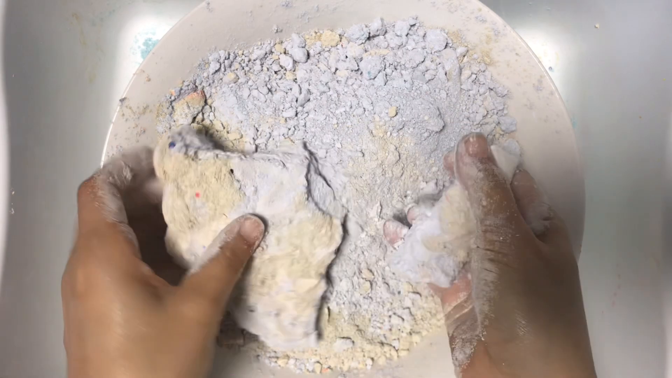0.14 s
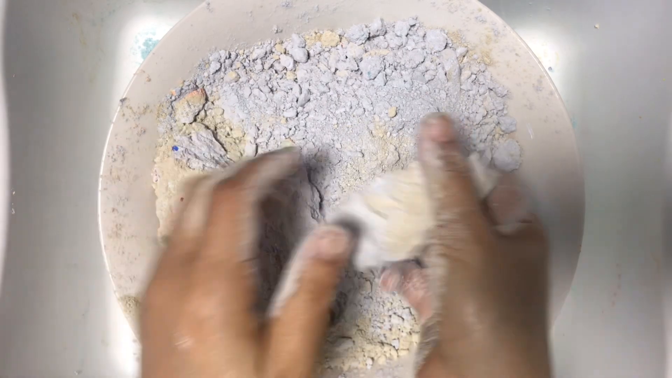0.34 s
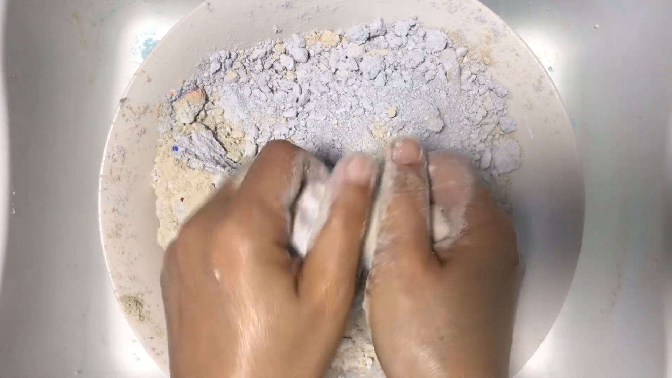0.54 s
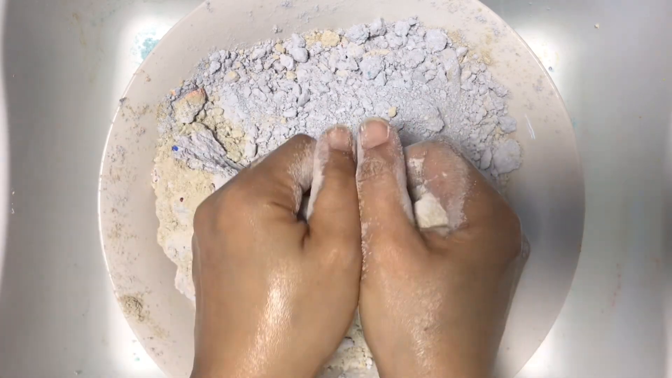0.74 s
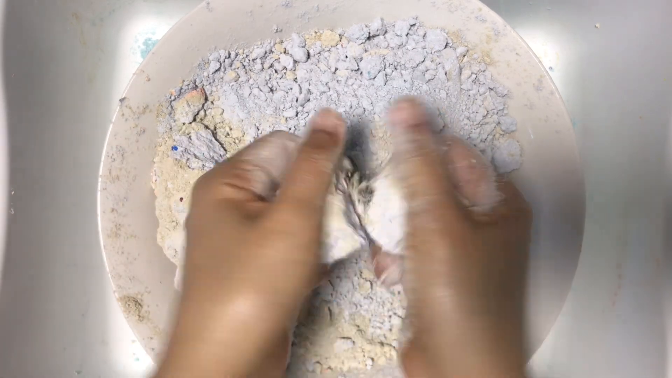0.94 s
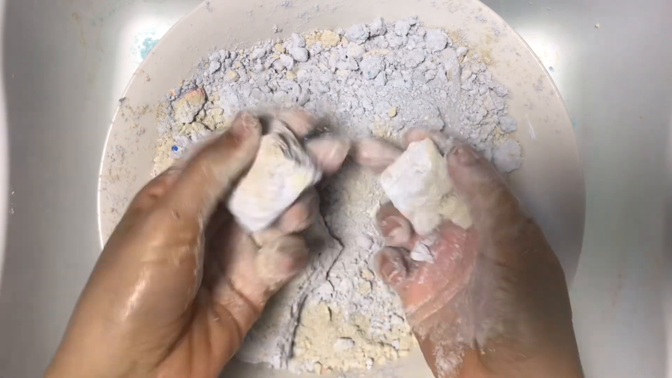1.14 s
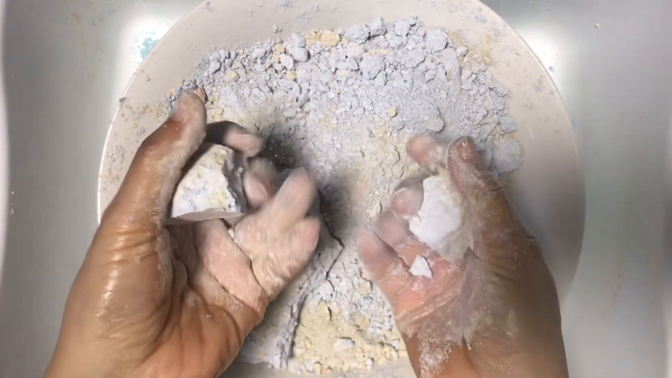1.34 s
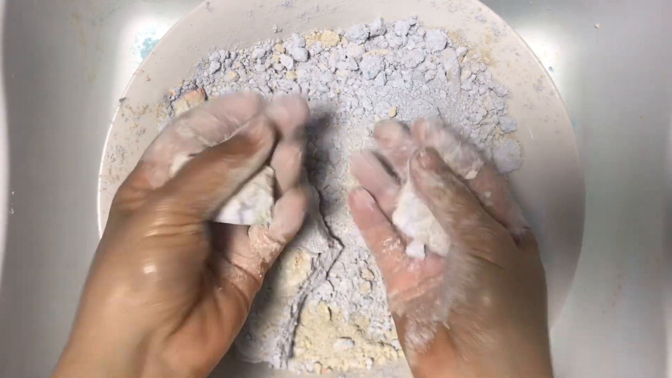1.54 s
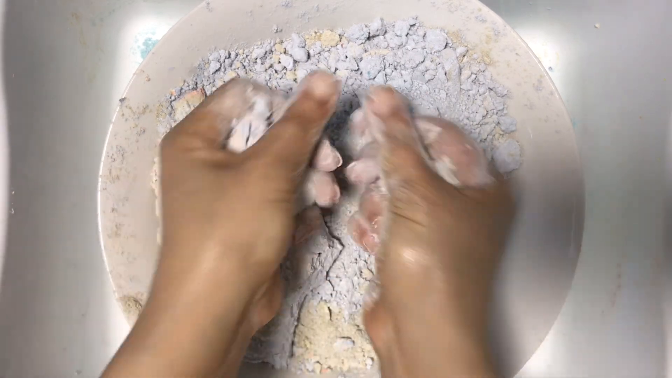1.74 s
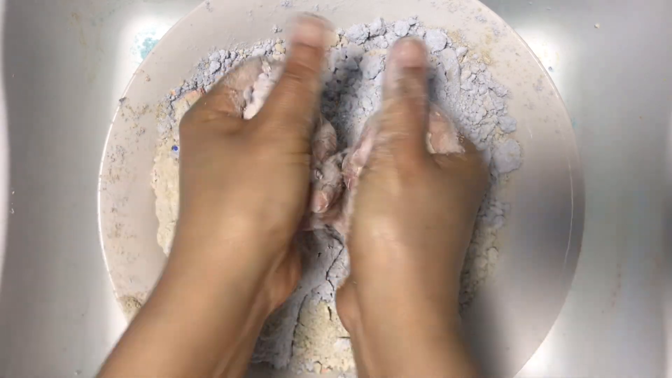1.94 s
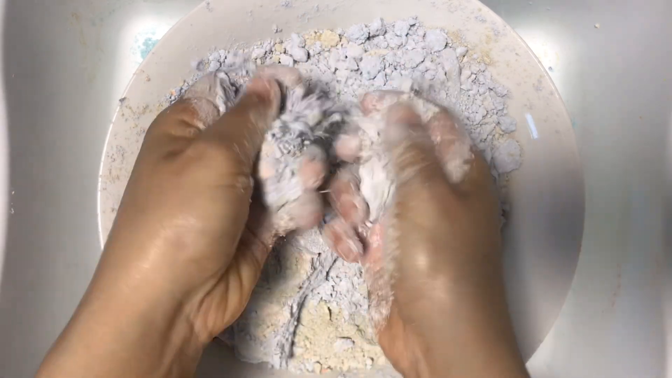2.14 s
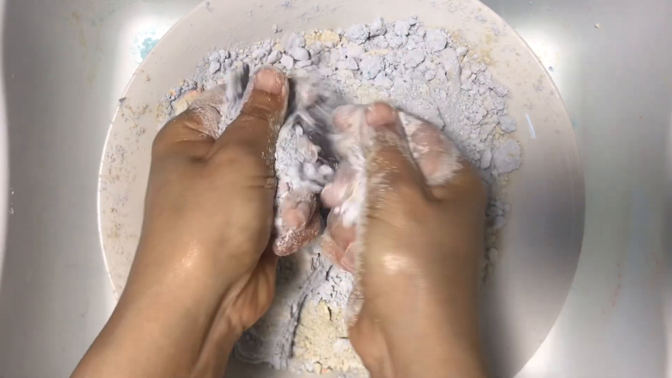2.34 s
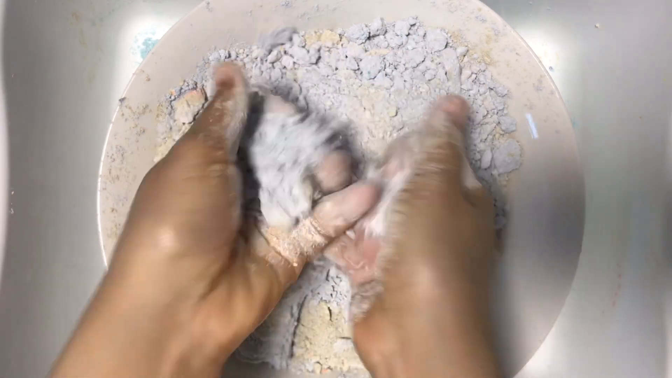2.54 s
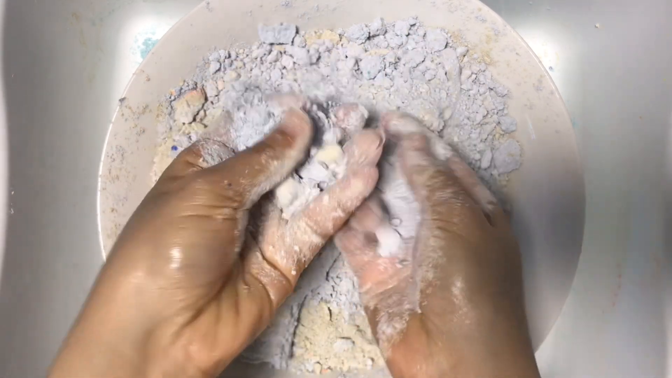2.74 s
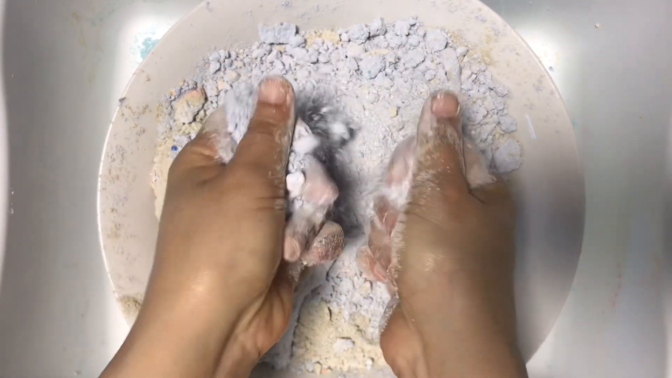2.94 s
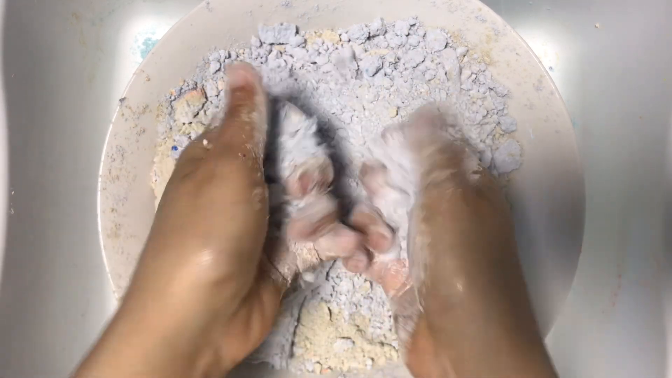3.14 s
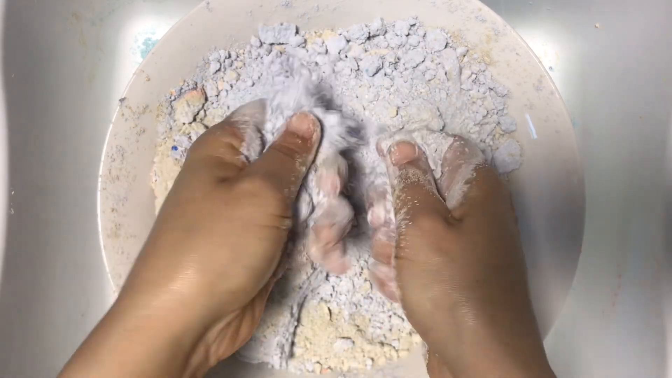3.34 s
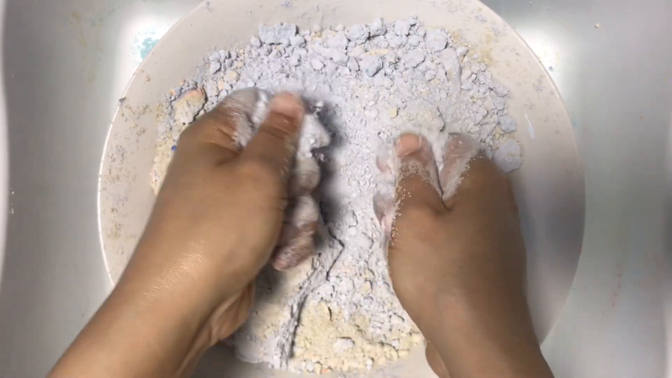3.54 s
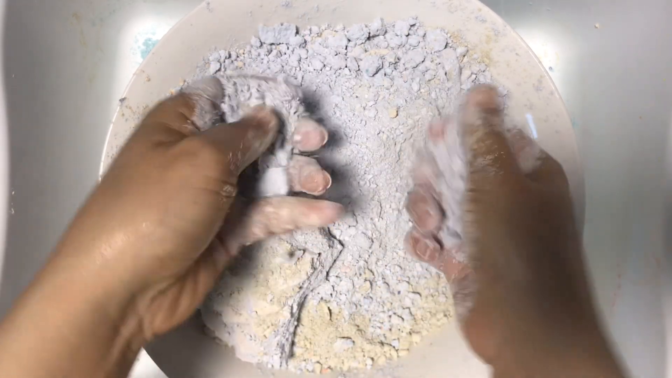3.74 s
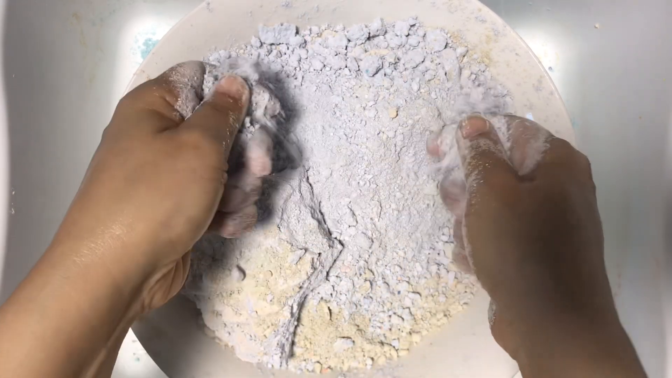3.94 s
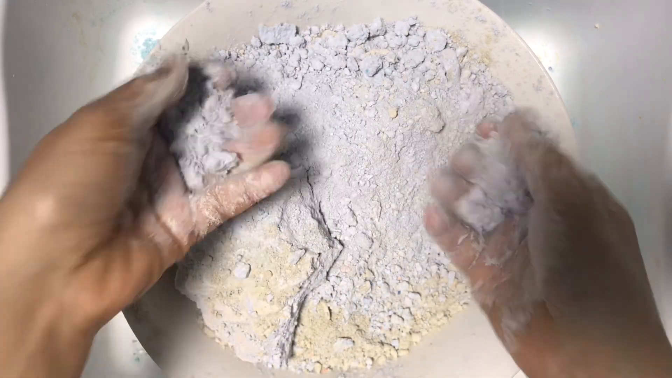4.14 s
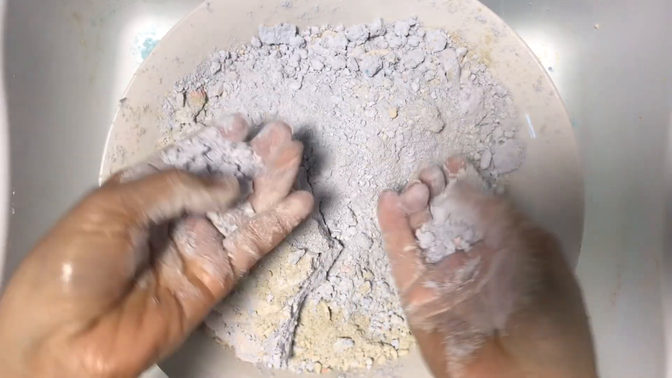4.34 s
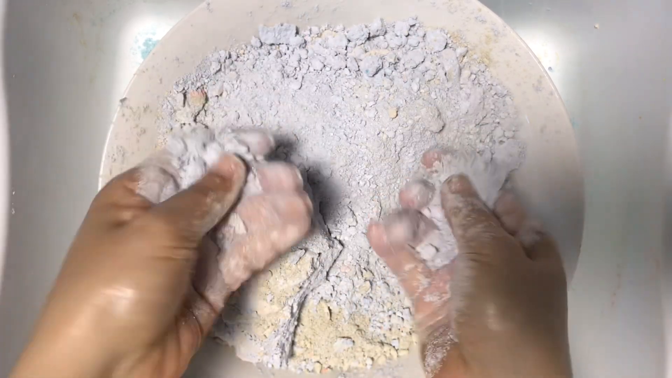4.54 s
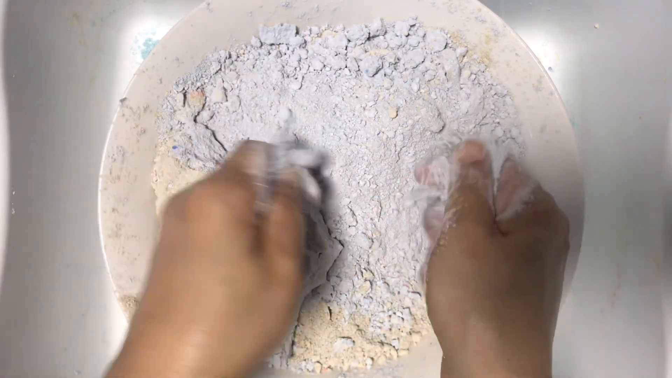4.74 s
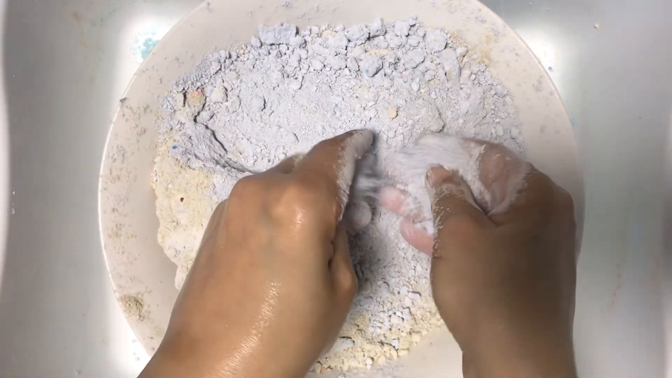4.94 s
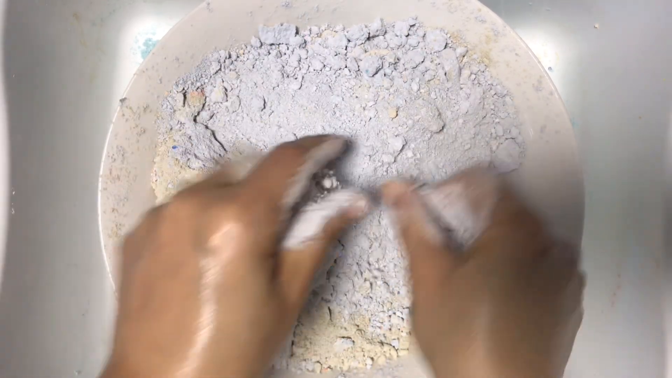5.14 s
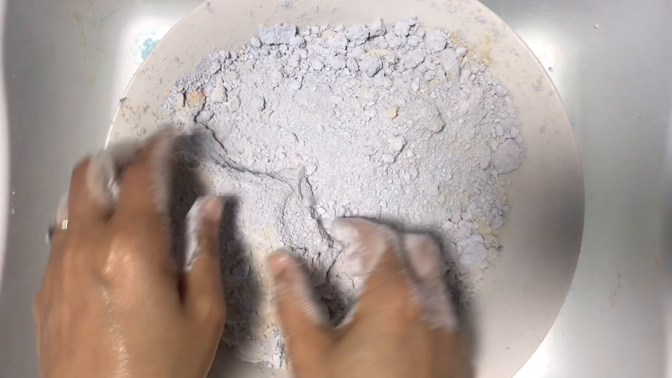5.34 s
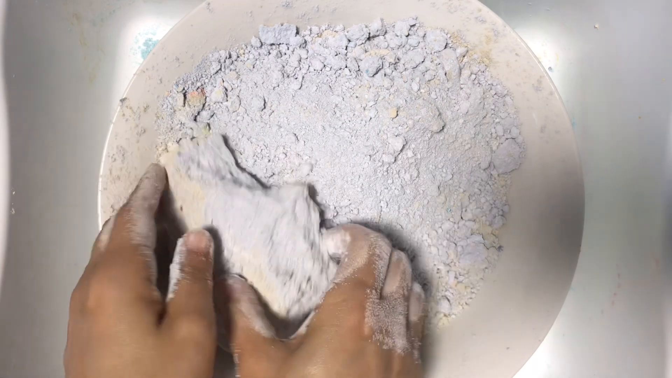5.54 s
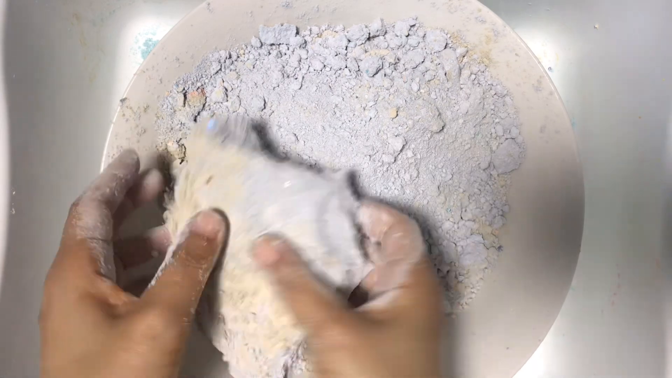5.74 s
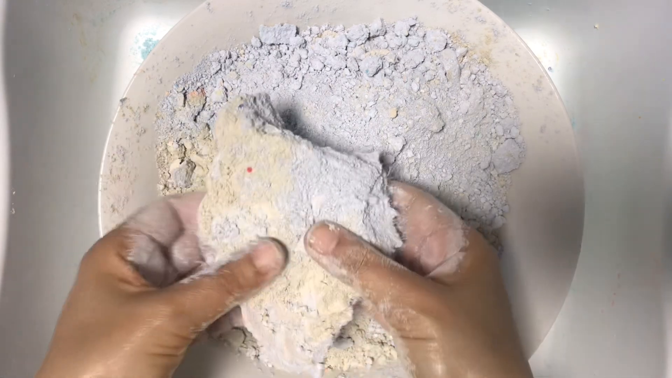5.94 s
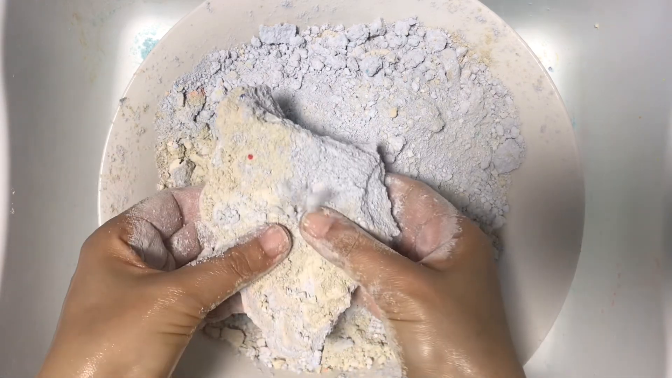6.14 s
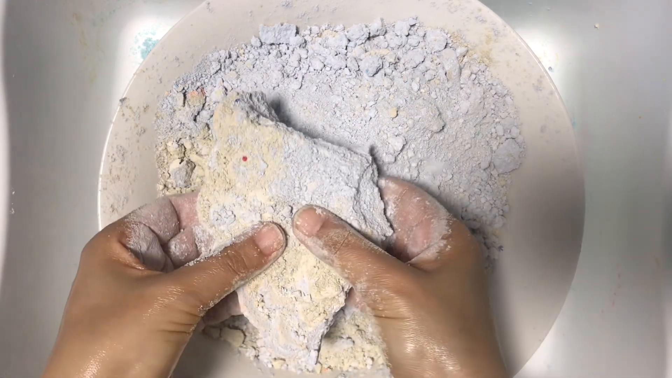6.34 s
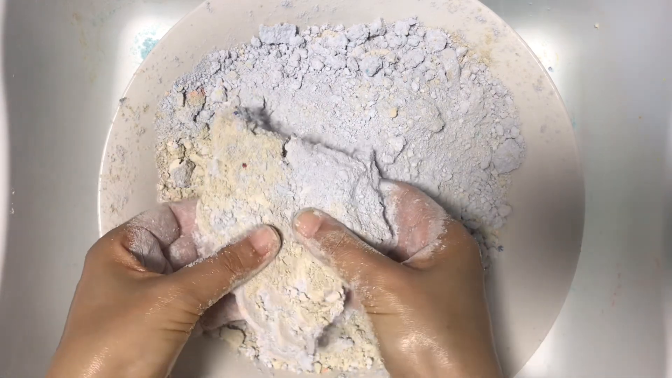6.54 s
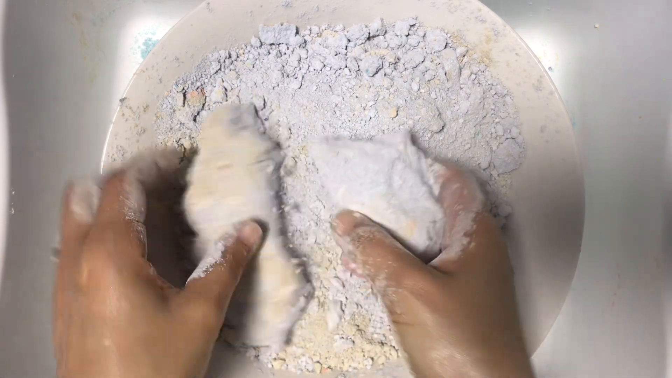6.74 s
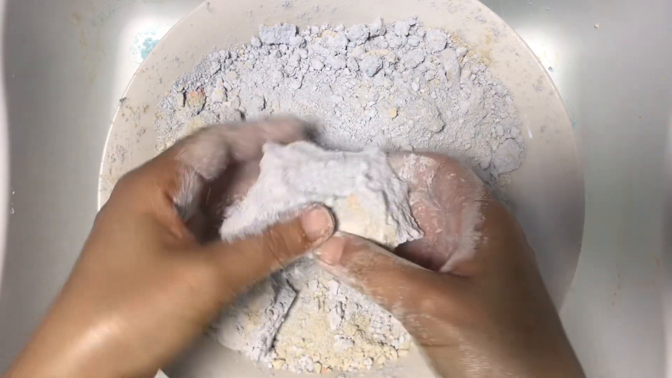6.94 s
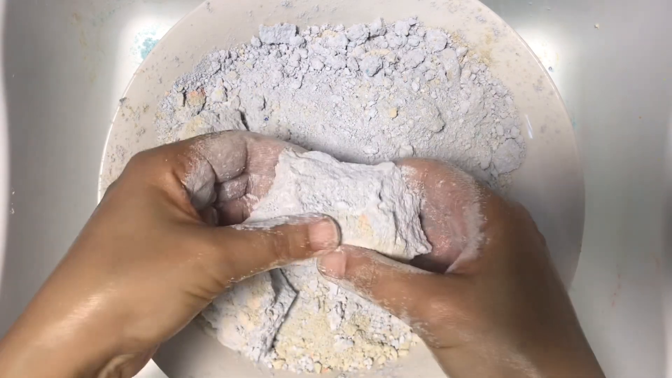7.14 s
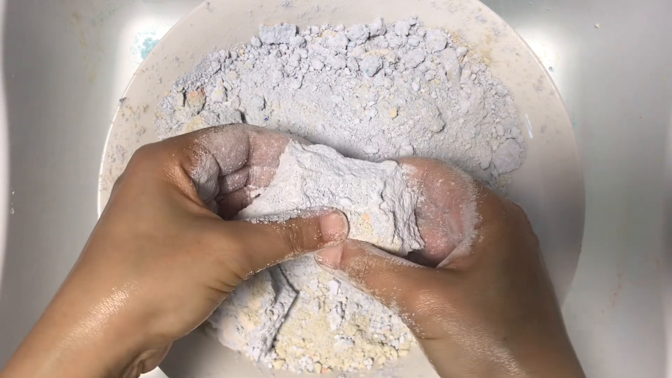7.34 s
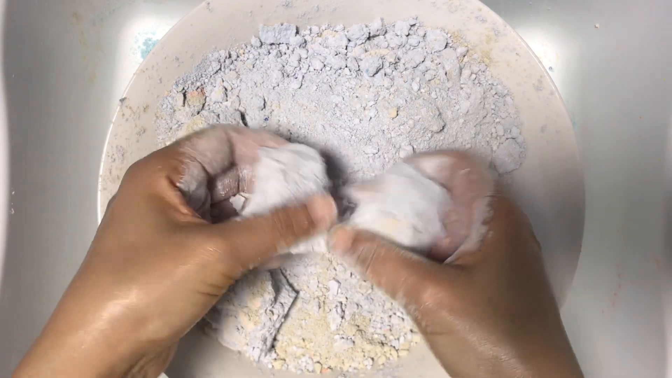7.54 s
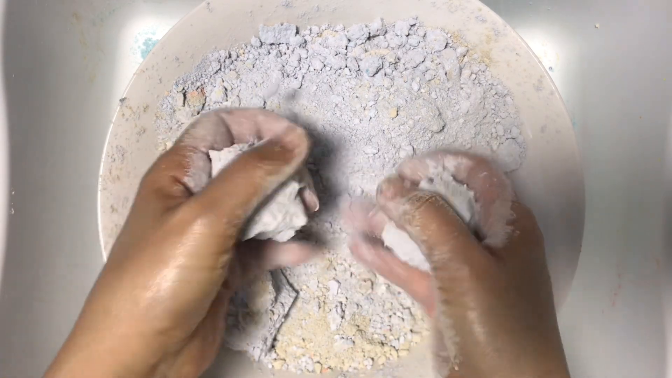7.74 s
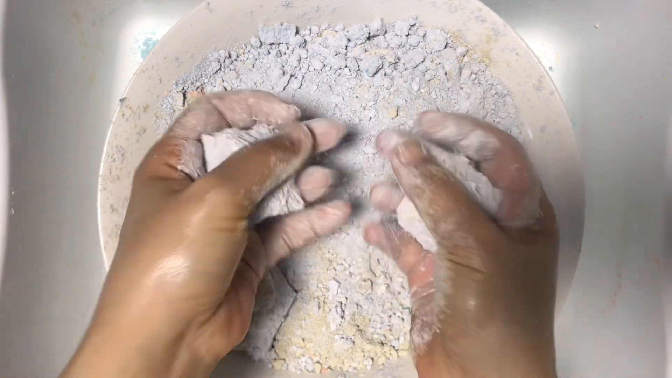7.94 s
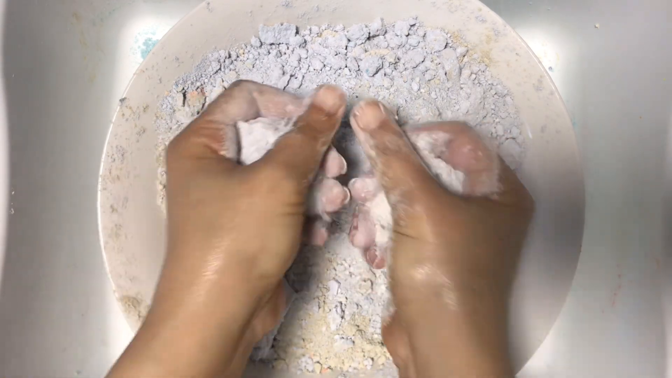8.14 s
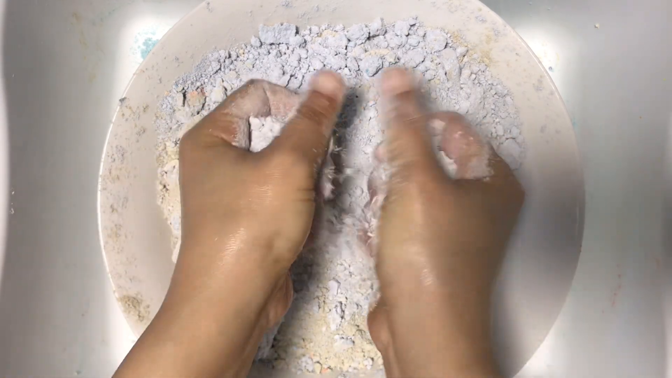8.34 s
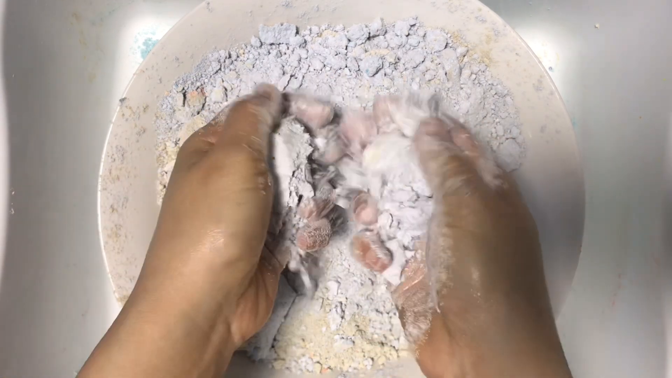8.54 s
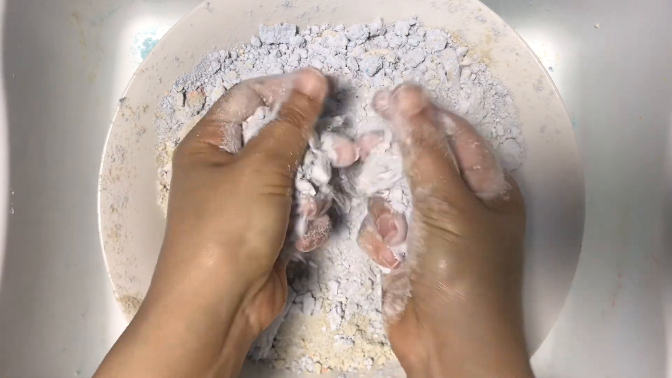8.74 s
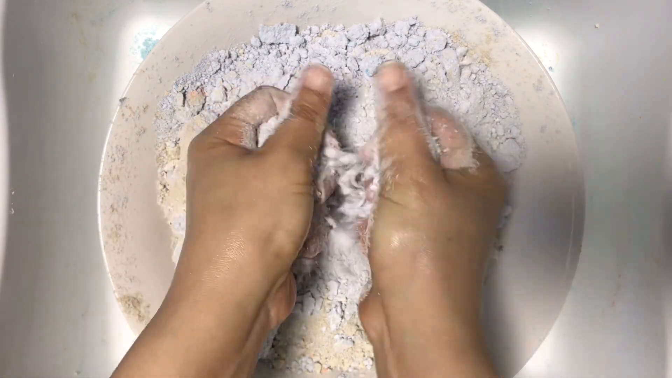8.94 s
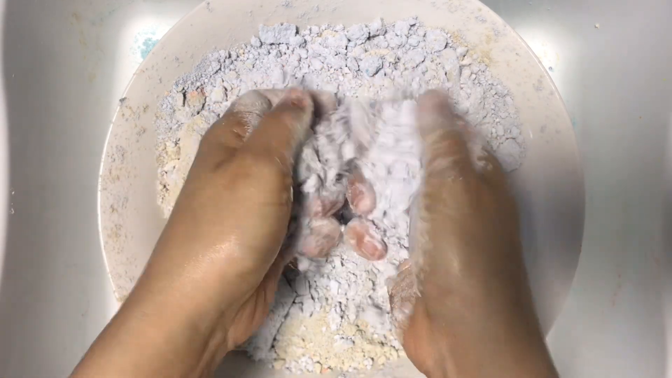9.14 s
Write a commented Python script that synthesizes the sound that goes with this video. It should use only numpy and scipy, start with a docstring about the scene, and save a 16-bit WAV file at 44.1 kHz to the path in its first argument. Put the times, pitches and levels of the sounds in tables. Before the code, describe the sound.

Close, dry crackling of chalk crushed by hand, powdery rubbing and pattering crumbs, a few heavy low thumps, in a quiet room.

```python
"""Chalk crumbled over a bowl

Two hands break and crumble lumps of chalk over a bowl of powder on a table; a phone stands close by on it.
Shaped noise makes the hiss of powder, the crunch and the dust; short rings make the snaps of the lumps.
Stretching swings thud in the table, decaying modes ring the bowl and a thin bangle,
and a slow drifting tone is the jolted stand. A quiet room lies behind."""
import sys
import numpy as np
from scipy import signal
from scipy.fft import rfft, irfft, next_fast_len
from scipy.io import wavfile
from scipy.ndimage import uniform_filter1d

SR = 44100
rng = np.random.default_rng(int(sys.argv[2]) if len(sys.argv) > 2 else 0)


def makeup_ratio(level_db):
    """Linear amplitude ratio for a level in decibels (20 dB per factor of ten)."""
    decades = np.asarray(level_db, float) / 20
    return 10 ** decades


def transcribe(signal):
    """Save signal, clipped to [-1, 1], as a 16-bit WAV file at the path in sys.argv[1]."""
    frames = np.atleast_2d(signal).T
    limited = np.clip(frames, -1, 1)
    pcm = np.round(limited * 32767).astype(np.int16)
    wavfile.write(sys.argv[1], SR, pcm)


N = 409688
T = np.arange(N) / SR

# work of the hands: [t/s, powder hiss level/dB, crumb crunch level/dB, weight on the table before shaping level/dB]
HAND_WORK = [(0.0, -49.5, -49, -43), (0.18, -56.5, -52, -38.5), (.3, -59, -57.5, -50),
             (0.57, -50.5, -60, -58), (0.82, -70, -62, -66), (1, -62, -54.5, -43.5),
             (1.25, -54.5, -56, -51), (1.52, -53, -55, -52), (1.6, -44, -49.5, -41),
             (1.76, -68, -48.5, -43), (1.91, -52, -53.5, -48), (2.08, -48.5, -48, -41),
             (2.3, -54, -45.5, -42.5), (2.44, -48, -48.5, -40), (2.51, -60.5, -57, -44),
             (2.75, -48, -52, -43), (2.9, -64, -48.5, -41.5), (3.1, -49.5, -52.5, -45),
             (3.22, -58, -55.5, -44), (3.3, -59, -52.5, -40.5), (3.52, -55.5, -53.5, -46),
             (3.6, -51.5, -52.5, -45), (3.75, -61, -53, -46), (3.98, -52.5, -55, -48),
             (4.2, -66, -56.5, -48), (4.34, -61, -55, -49.5), (4.68, -58, -51, -44.5),
             (4.82, -56, -54.5, -47), (4.97, -56, -48.5, -39.5), (5.12, -54.5, -54.5, -52.5),
             (5.45, -65, -52.5, -38.5), (5.69, -59, -52, -45.5), (5.93, -57, -55.5, -51),
             (6.1, -68, -68, -65), (6.38, -70, -72.5, -68), (6.45, -59, -58.5, -49),
             (6.75, -59, -50.5, -32), (6.91, -52.5, -55, -53), (7.06, -57, -59.5, -50),
             (7.13, -62, -67, -56), (7.33, -73, -71.5, -65), (7.45, -56.5, -62.5, -55),
             (7.81, -53, -57, -46.5), (8.12, -53.5, -51, -38.5), (8.36, -60, -48.5, -51),
             (8.52, -54.5, -52, -39.5), (8.75, -57, -51, -33.5), (8.98, -58, -52, -41),
             (9.29, -60, -51, -39)]
# spectra: [f/Hz, relative density level/dB]
HISS_SPECTRUM = [(1760, -56), (3000, -20), (3620, -5), (4030, -5), (4410, -3.5), (4860, -6), (6900, -1),
                 (8400, -1.5), (9200, -0.5), (11200, -3.5), (12300, -8), (13900, 0), (15500, 1),
                 (16000, -19)]
CRUNCH_SPECTRUM = [(240, 13.5), (400, 1.5), (569, 1.5), (757, -5), (1100, -1), (1230, -3.5), (1530, -3.5),
                   (1770, -7), (2150, -6), (2610, -6), (2970, -4.5), (3390, -7), (3860, -6.5),
                   (5930, -13.5), (9000, -11.5), (11700, -25), (19800, -120)]
RUMBLE_SPECTRUM = [(76, -19), (130, 0), (162, -2), (215, -1.5), (319, -12.5), (484, -36), (577, -28),
                   (800, -24), (1040, -48), (1760, -120)]
TABLE_HUM_SPECTRUM = [(22, -65), (38, -1), (54, -10.5), (70, -6), (107, -5.5), (121, -4.5), (150, -37),
                      (200, -58), (330, -120)]
DUST_SPECTRUM = [(2060, -12), (3500, -10), (3870, -7), (5930, -7.5), (9260, -5.5), (11500, -15),
                 (13600, -14), (15200, -11), (16000, -23)]
# slides and bright ticks, with the dip of the microphone port: [f/Hz, relative density level/dB]
PORT_SPECTRUM = [(200, 23), (1500, -3.5), (9500, 0), (11700, -7), (14000, -2.5), (17000, -18)]
TABLE_HUM_DB = -1  # over the weight on the table

# breaks of chalk: [t/s, crack peak level/dB, crack pitch f/Hz, dust drive level/dB, crumbs drive level/dB]
SNAP_EVENTS = [(.099, -32, 2570, -46, -45), (.143, -36, 3300, -52, -41.5), (.173, -24, 2655, -46, -18),
               (.406, -41, 1510, -51, -29), (.676, -37, 3000, -50, -48), (.7537, -35, 2260, -33, -27),
               (.9245, -47, 9050, -36, -39), (1.4128, -24, 9050, -28.5, -58), (1.5667, -32, 4070, -32, -30),
               (1.5808, -42, 9130, -27.5, -36), (1.6102, -38, 2130, -36, -44),
               (1.6353, -34, 2300, -51, -51), (1.645, -28, 3770, -48, -56), (1.6703, -40, 7520, -44, -40),
               (1.6905, -32, 2210, -29, -40), (1.705, -24.5, 3080, -25, -44), (1.7105, -26, 2160, -30, -30),
               (1.7371, -19.5, 2200, -30, -18), (1.7618, -20, 2900, -21.5, -18),
               (1.7645, -25, 2300, -33, -30), (1.7704, -29, 1570, -51, -22), (1.7805, -30, 1000, -55, -40),
               (1.7875, -26, 1300, -53, -36), (1.804, -30, 1190, -50, -36), (1.8274, -40, 2290, -28, -15.5),
               (1.839, -37, 2250, -50, -45), (1.851, -36, 1100, -44, -42), (1.883, -37, 1000, -55, -47),
               (1.948, -40, 3500, -35, -40), (1.9716, -33.5, 3670, -33, -30), (2.0413, -43, 7520, -44, -26),
               (2.1244, -42, 6000, -39, -51), (2.2135, -45, 3000, -48, -47), (2.228, -44, 3200, -42, -42),
               (2.2457, -25, 1570, -27, -36), (2.249, -32, 3200, -29, -39), (2.3467, -44, 2700, -38, -41),
               (2.366, -31, 1540, -40, -25), (2.4737, -31, 1010, -39, -21), (2.8474, -43, 2270, -50, -28),
               (2.8902, -29, 1470, -52, -22), (2.9065, -40, 2000, -44, -36),
               (2.9208, -26.5, 1500, -56, -27), (2.931, -31, 3500, -52, -42), (2.94, -35, 2500, -44, -45),
               (2.959, -38, 1500, -50, -47), (2.978, -43, 1200, -55, -49), (3.0074, -38, 6400, -33, -38),
               (3.026, -42, 7000, -44, -46), (3.069, -40, 3500, -48, -43), (3.103, -38.5, 2100, -55, -31),
               (3.1885, -29, 4400, -31, -59), (3.2558, -34, 3220, -48, -35), (3.268, -30, 4200, -46, -27),
               (3.312, -37, 1300, -52, -30), (3.344, -42, 4500, -48, -50), (3.406, -42, 7000, -42, -50),
               (3.4105, -27, 4830, -41, -27), (3.435, -44, 6500, -54, -53), (3.4865, -38, 2140, -57, -28),
               (3.802, -34, 3250, -38, -46), (3.8551, -32, 8500, -38, -33), (3.8823, -29, 9550, -44, -26),
               (4.153, -41, 1490, -35, -28), (4.215, -38, 9500, -33, -53), (4.227, -28, 10700, -34, -37),
               (4.283, -42, 3500, -42, -57), (4.38, -41, 5260, -51, -57), (4.5096, -48, 2960, -30, -27),
               (4.6004, -51, 2500, -52, -47), (4.628, -48, 2300, -52, -36), (4.6693, -45, 1200, -34, -37),
               (4.6897, -36, 2220, -41, -49), (4.725, -45, 2500, -50, -38), (4.9205, -34, 2250, -51, -40),
               (4.9487, -34, 2290, -51, -38), (4.973, -37, 1300, -50, -42), (5.0286, -35, 3040, -37, -34.5),
               (5.1484, -31, 6310, -32, -37), (5.2256, -18.5, 8060, -31, -57), (5.236, -38, 7800, -44, -55),
               (5.3165, -40, 9000, -52, -57), (5.387, -34, 1520, -57, -57), (5.7314, -41, 8750, -49, -57),
               (6.094, -46, 4300, -48, -48), (6.3921, -26.5, 2350, -17.5, -13),
               (6.409, -35, 2150, -36, -35), (6.6054, -40, 1730, -35, -27.5), (7.0095, -43, 3500, -44, -55),
               (7.031, -37, 9000, -46, -60), (7.047, -29, 9780, -50, -59), (7.3376, -23, 2200, -17, -14.5),
               (7.6026, -32, 6260, -39, -42), (7.695, -31, 6100, -55, -58), (7.7253, -35, 4300, -46, -38),
               (7.739, -42, 6000, -51, -60), (7.808, -43, 6000, -55, -62), (7.817, -34, 9550, -45, -68),
               (8.001, -42, 8250, -34, -41), (7.348, -31, 2100, -53, -48), (7.35, -24, 950, -57, -53),
               (7.366, -39, 900, -57, -52), (7.376, -38, 900, -55, -52), (7.359, -40, 2200, -54, -52),
               (8.0406, -25, 2200, -23.5, -20.5), (8.057, -45, 2200, -59, -53),
               (8.067, -47, 2200, -62, -56), (8.1224, -33, 2190, -50, -48), (8.13, -38, 1500, -55, -35),
               (8.1373, -25.5, 4790, -37, -37), (8.154, -29.5, 2250, -48, -52),
               (8.1928, -27, 1570, -49, -20), (8.196, -30, 2200, -40, -35), (8.2287, -25, 1610, -42, -26),
               (8.234, -31, 2300, -36, -20), (8.2372, -17, 3730, -45, -12), (8.2712, -27, 2200, -24.5, -24),
               (8.281, -33, 2200, -53, -60), (8.2924, -31, 4500, -50, -61), (8.3684, -43, 1730, -60, -44),
               (8.4085, -36, 2100, -52, -36), (8.513, -38, 3190, -52, -44), (8.527, -32.5, 1540, -60, -43),
               (8.544, -38, 1300, -58, -34), (8.5825, -36, 1380, -41, -27), (8.689, -33, 3280, -38, -51),
               (8.7205, -40, 2000, -40, -37), (8.742, -29, 3870, -36, -31), (8.768, -31, 3170, -32, -34),
               (8.833, -44, 2190, -55, -50), (8.855, -42, 2940, -53, -30), (8.895, -44, 3800, -54, -45),
               (9.0052, -41, 2780, -35.5, -36), (9.1335, -25, 8950, -27, -28),
               (9.178, -23, 9160, -24.5, -17.5), (9.186, -30.5, 4500, -34, -33)]
PIECE_CYCLES = 11  # cycles until a ringing piece is 60 dB down
CRACK_AFTER_MS = 0.8  # the piece gives way just after the first dust
SPRAY_DB, SPRAY_SLOPE = -5.5, -0.29  # spray drive under a burst of -35 dB; dB change per dB of louder burst
DUST_SPRAY_DB = -1  # dust settles fainter than crumbs
TICK_AFTER_MS = 1.4  # both ticks come near the height of a break
TICK_DB, TICK_MS = -11.5, 0.075  # bright tick: drive over the dust, decay
DULL_TICK_DB, DULL_TICK_MS = -9.5, 0.33  # lower tick: drive over the crumbs, decay
CRUMBS_BOWL_DB, CRACK_BOWL_DB = -21.5, -19.5  # crumbs and cracks drive the upper modes of the bowl
SMALL_COUNT = 500
CROWDING = 1.9  # how strongly lesser snaps gather where the crunch is loud
SMALL_CRACK_DB, SMALL_BURST_DB = -3, -1.5  # ceilings over the crunch of the moment
SMALL_SCATTER_DB = 11  # mean drop below those ceilings

# blows on the table: [t/s, peak level/dB, first swing/ms, decay setting/ms, direction +1 or -1,
# evenness of the swings (1 = all alike)]
THUD_EVENTS = [(.196, -24, 2.8, 7.3, -1, .6), (0.211, -13.5, 3.5, 16, 1, 0.57),
               (0.237, -16, 4.2, 27, 1, 0.63), (0.756, -18.5, 1.9, 7.1, 1, 0.56),
               (0.977, -30, 2.8, 80, 1, 0.68), (1.578, -24, 3.6, 9.9, -1, 0.56),
               (1.7045, -9, 3.5, 6.8, 1, 0.79), (1.7614, -8.5, 2.7, 11, 1, 0.75),
               (1.8282, -17, 4.3, 2.8, 1, 0.53), (1.976, -25, 2.55, 4.6, -1, .7),
               (2.044, -26.5, 6.3, 7.1, 1, 0.64), (2.249, -21, 6.1, 6.9, -1, .9),
               (2.272, -28, 3.1, 6, 1, 0.8), (2.358, -23, 3.1, 8, -1, 0.78),
               (2.45, -26, 2.5, 2.5, -1, 0.65), (2.893, -23, 1.67, 12, 1, .6),
               (4.972, -32, 2.2, 16, 1, 0.63), (5.808, -6.5, 5.45, 5.8, 1, 1.03),
               (5.91, -24, 4.6, 11, -1, 0.81), (6.095, -28.5, 6, 5.8, -1, 0.86),
               (6.3939, -7, 1.8, 5.4, 1, 0.61), (6.616, -18, 1.24, 12, 1, 0.58),
               (6.756, -19, 2.1, 14, -1, 0.62), (6.7672, -15, 3.7, 2.3, 1, .6),
               (7.339, -1, 1.84, 6.6, 1, 0.56), (8.0433, -12, 2.1, 5, 1, 0.58),
               (8.128, -25.5, 3.8, 33, 1, 1.), (8.196, -20, 2.5, 6.5, -1, 0.77),
               (8.23, -24, 1.08, 28, -1, 0.67), (8.242, -14, 3.1, 5.8, -1, 0.86),
               (8.2729, -14, 2.23, 7.3, 1, 0.77), (8.7208, -20, 1.7, 6.9, 1, 0.63),
               (8.7682, -33, 4, 18, 1, .6), (8.9965, -27, 1, 27, -1, 0.56), (9.135, -20.5, 6.6, 3.2, 1, .6),
               (9.182, -18, 2.2, 25, 1, 0.58)]
BUILD_UP = 0.5  # build-up of a full-scale blow, as a share of its first swing
HARDENING = 0.24  # dB longer build-up for each dB softer

# skin slides on dry chalk: [start t/s, length/s, level before swell and spectrum/dB, pitch f/Hz]
SLIDE_EVENTS = [(0.069, 0.14, -53, 2760), (0.088, 0.077, -38, 12700), (0.366, 0.038, -46.5, 9150),
                (0.484, 0.071, -35, 11000), (.54, 0.077, -61, 9200), (0.913, 0.069, -37.5, 10800),
                (0.978, 0.062, -43.5, 11000), (1.111, 0.057, -43.5, 10400), (1.147, 0.054, -40, 11100),
                (1.187, 0.18, -42.5, 11200), (1.303, 0.057, -37.5, 11200), (2.051, 0.088, -43.5, 8000),
                (2.415, 0.064, -48, 8000), (4, 0.072, -48, 8000), (5.229, 0.082, -49, 8000),
                (5.566, 0.066, -49.5, 9000), (5.767, 0.085, -48, 8500), (5.843, 0.057, -51, 8500),
                (5.897, 0.055, -44, 11000), (6.535, 0.12, -49.5, 7700), (6.627, 0.058, -42.5, 10100),
                (6.778, 0.045, -49, 8000), (6.878, 0.025, -43.5, 8000), (6.997, 0.12, -49.5, 8860),
                (7.438, 0.11, -50, 7400), (7.58, 0.088, -41.5, 10100), (7.698, 0.012, -36, 9900),
                (7.812, 0.038, -32, 10400), (7.972, 0.074, -45, 7560), (8.39, 0.1, -43, 7200),
                (8.63, 0.055, -39, 9800), (9.002, .04, -45.5, 6500), (9.083, 0.061, -40, 8900),
                (9.16, 0.074, -36, 9800)]
SLIDE_WIDTH = 0.82  # width of the hiss as a share of its pitch
# short scraping hisses, some narrow and some broad: [start t/s, length/s, # level before swell and spectrum/dB,
# pitch f/Hz, width/Hz]
SCRAPE_EVENTS = [(0.076, .06, -50, 2900, 1000), (.175, .06, -46, 2900, 1500),
                 (0.497, .032, -44.5, 4440, 900), (.5, 0.033, -55, 2200, 300),
                 (0.518, .065, -49, 4020, 450), (0.607, .022, -50, 4300, 450),
                 (2.058, 0.12, -48, 2870, 1800), (2.378, 0.079, -44, 2600, 2500),
                 (7.008, .07, -57, 3700, 300), (7.045, .012, -42, 6500, 800), (8.045, .03, -51, 2250, 400),
                 (8.111, .05, -49, 2200, 500), (9.14, .09, -43, 3480, 2500), (8.24, 0.049, -40, 2200, 700)]

# lumps knock the bowl: [t/s, kick level/dB]
KNOCK_EVENTS = [(0.182, -23.5), (.193, -28), (.205, -21), (.217, -26), (0.227, -25.5), (0.753, -27.5),
                (1.705, -19), (1.734, -25), (1.828, -20.5), (1.971, -25.5), (2.366, -26), (2.473, -26.5),
                (2.921, -25), (3.855, -27), (4.69, -32), (5.379, -23), (5.4, -17), (5.412, -26),
                (5.426, -28.5), (5.566, -27.5), (6.3935, -10.5), (6.4, -31), (6.61, -24), (6.747, -22),
                (6.757, -32), (6.767, -22.5), (7.3395, -10.5), (7.348, -20), (7.362, -29), (7.38, -25),
                (8.042, -19), (8.193, -26), (8.232, -22), (8.687, -25.5), (8.9, -28), (8.994, -34.5),
                (9.181, -27)]
# modes of the bowl: [f/Hz, width setting/Hz, level/dB]
BOWL_MODES = [(305, 20, -13.5), (450, 52, -4.5), (550, 81, 0), (950, 140, -11.5), (2200, 176, -11)]
GRIT_PER_S, GRIT_DB = 250.0, -15.5  # crumbs that strike the bowl; drive over the crunch

# bangle clinks before the trim of each mode: [t/s, then rms level/dB of mode 1, mode 2, mode 3, mode 4,
# modes 5-6, modes 7-10]
CLINK_EVENTS = [(.086, -62, -50, -56.5, -62, -64.5, -62), (.114, -62, -45, -53, -62, -64, -64),
                (.206, -60, -57, -43, -54, -62, -64), (0.409, -48, -64, -47, -54, -47, -50),
                (0.449, -57, -56, -46, -59, -51, -64), (1.432, -62, -59, -46, -59, -39, -51),
                (1.513, -52, -52, -35, -47, -49, -51), (2.37, -32, -60, -47, -58, -54, -58),
                (2.379, -48, -41, -58, -60, -60, -60), (2.4742, -35, -42.5, -60, -62, -50, -58),
                (3.7615, -51, -47, -45, -53, -53, -54), (3.911, -44, -46, -39, -46, -60, -63),
                (4.0817, -63, -65, -58, -47, -56, -49), (4.135, -66, -67, -65, -52, -50, -53),
                (4.155, -48, -50, -55, -48, -55, -53), (4.1648, -47, -54, -53, -55, -48, -45),
                (4.1907, -52, -53, -46, -51, -48, -47), (4.228, -55, -60, -42, -47, -46, -39),
                (4.608, -60, -60, -40, -45, -47, -56), (5.246, -64, -57, -52, -57, -54, -53),
                (5.2539, -66, -49, -52, -49, -44, -50), (5.27, -67, -54, -39, -50, -54, -50),
                (5.29, -51, -56, -37, -52, -48, -47), (5.3438, -64, -62, -55, -52, -52, -52),
                (5.358, -66, -63, -52, -48, -56, -61), (5.386, -39, -56, -45, -59, -57, -60),
                (5.402, -48, -60, -54, -50, -54, -47), (5.7066, -64, -64, -53, -53, -60, -60),
                (5.732, -58, -57, -55, -62, -43, -44), (5.777, -46, -52, -37, -46, -54, -54),
                (5.972, -50, -60, -43.5, -52, -66, -70), (8.324, -48, -58, -31.5, -41, -37.5, -47)]
# chatter along the wrist before trim and offsets: [start t/s, length/s, second mode level/dB,
# third mode level/dB, higher modes level/dB]
RATTLE_EVENTS = [(0.276, .04, -66, -66, -72), (4.08, 0.19, -76, -58, -60), (5.242, 0.17, -62, -60, -62.5),
                 (6.75, 0.039, -63, -57, -58)]
# modes of the hoop: [f/Hz]
BANGLE_MODE_HZ = [1505, 2664, 4101, 5621, 7197, 8742, 10400, 12020, 13920, 15440]
# time for each mode to fall 60 dB against the skin: [t/s]
BANGLE_RING_S = [0.041, 0.15, 0.041, 0.074, .07, 0.072, 0.08, 0.08, 0.08, .06]
# trim of each mode within its group: [level/dB]
BANGLE_TRIM_DB = [-1.5, -4, -3.5, -3, -9, -3, -3, -20, -12, -18]
FREE_RING_DB, FREE_RING_TIMES = -11, 2.4  # hoop clear of the skin: level, and how many times longer it rings

# jolts of the stand: [t/s of widest swing, level/dB, build-up/s, dying away/(dB per s)]
JOLT_EVENTS = [(.3, -12.5, 0.11, 96), (.57, -34, .1, 108), (1.07, -34, 0.073, 100), (1.8, -30, 0.31, 62),
               (2.74, -42, .1, 120), (4.29, -52, 0.13, 120), (5.5, -13.5, 0.096, 83),
               (6.42, -30, 0.044, 142), (6.69, -12, 0.092, 66), (6.86, -12, 0.25, 117),
               (7.12, -29.5, 0.34, 150), (7.4, -40, .1, 200), (7.62, -29.5, 0.092, 92)]
SWAY_HZ = 22.4
TREMBLE_DB = -21  # trembling of the stand, over the weight on the table
SHUDDER_DB = -18.5  # shaking of the table top, under the swing

# quiet room: [f/Hz, relative density level/dB]
ROOM_SPECTRUM = [(18, -20), (30, -4.5), (50, -4), (110, -9.5), (250, -20), (500, -22), (943, -29.5),
                 (2080, -33), (6000, -38), (9500, -38.5), (12000, -38.5), (14000, -39), (16200, -46)]
ROOM_DB = -46


def colour(x, points):
    """Shapes x by an (f/Hz, level/dB) spectrum; white noise of rms 1 keeps rms 1."""
    size = next_fast_len(N + 8192)
    hz, db = np.transpose(points)
    bins_hz = np.fft.rfftfreq(size, 1 / SR)
    gain = makeup_ratio(np.interp(np.log(bins_hz + 1), np.log(hz), db, left=-90, right=-90))
    return irfft(rfft(x, size) * gain / np.sqrt(np.mean(gain ** 2)), size)[:N]


def band(x, hz, width):
    """Band-pass; white noise of rms 1 keeps about rms 1."""
    edges = np.clip([hz - width / 2, hz + width / 2], 100, 0.45 * SR)
    sos = signal.butter(3, edges, "band", fs=SR, output="sos")
    return signal.sosfilt(sos, x) * np.sqrt(SR / 2 / width)


def curve(table, column):
    """Gain over time from a level/dB column."""
    rows = np.array(table)
    return makeup_ratio(np.interp(T, rows[:, 0], rows[:, column]))


def add(out, s, x):
    """Mixes x into out from time s."""
    i = int(s * SR)
    out[i:i + len(x)] += x[:max(N - i, 0)]


def ring(x, hz, t60):
    """One decaying mode driven by x; a unit kick gives a unit swing."""
    pole = np.exp(2j * np.pi * hz / SR - np.log(1000) / (t60 * SR))
    return signal.lfilter([1], [1, -pole], x + 1e-18).imag


def flicker(rate, depth_db):
    """Gain that wanders at random about rate times a second."""
    k = int(SR / rate)
    steps = np.repeat(rng.standard_normal(N // k + 1), k)[:N]
    return makeup_ratio(depth_db * uniform_filter1d(steps, k))


def grains(per_s, spread_db, tail_ms):
    """Noise in short random bursts, a few much larger than the rest; rms 1."""
    when, size = rng.random((N, 2)).T
    heights = np.minimum(size ** (-spread_db / 20 * np.log(10)), 12)
    kicks = (when < per_s / SR) * heights
    decay = np.exp(-1000 / (tail_ms * SR))
    power = signal.lfilter([1], [1, -decay], kicks ** 2 + 1e-18)
    x = np.sqrt(power) * rng.standard_normal(N)
    return x / np.std(x)


def patter(centres_hz, per_s, spread_db, tail_ms, patchy_db):
    """Particles of several sizes; each size has its own pitch and comes in its own flurries."""
    together = flicker(20.0, patchy_db)
    x = np.zeros(N)
    for hz in centres_hz:
        particles = band(grains(per_s, spread_db, tail_ms), hz, 0.69 * hz)
        x += particles * np.sqrt(hz) * flicker(25.0, patchy_db)
    return together * x / np.std(x)


def hands():
    """Powder hisses between palms, crumbs crunch and patter, and their weight rumbles in the table."""
    powder = patter([3500, 7000, 14000], 4100.0, 2.9, 1.9, patchy_db=0.5)
    hiss = colour(powder, HISS_SPECTRUM) * curve(HAND_WORK, 1) * flicker(7.0, 0.28)
    crumbs = patter([500, 1000, 2000, 4000, 8000], 600.0, 4.2, 2.04, patchy_db=1.5)
    crunch = colour(crumbs, CRUNCH_SPECTRUM) * curve(HAND_WORK, 2)
    pushes = grains(600.0, 1.13, 3.3) * curve(HAND_WORK, 3)
    rumble = makeup_ratio(-5.0) * colour(pushes, RUMBLE_SPECTRUM) * flicker(8.7, 2.3)
    hum = makeup_ratio(TABLE_HUM_DB) * colour(pushes, TABLE_HUM_SPECTRUM) * flicker(8.0, 2.44)
    return hiss + crunch + rumble + hum


def small_snaps():
    """Lesser breaks at random moments, more of them and louder while the crunch is strong."""
    place, pitch, *scatter = rng.random((SMALL_COUNT, 5)).T
    crunch = curve(HAND_WORK, 2)
    chance = crunch ** CROWDING
    i = np.searchsorted(np.cumsum(chance), place * np.sum(chance) * (1 - 1 / N))
    db = 20 * np.log10(crunch[i]) + SMALL_SCATTER_DB * np.log(1 - np.array(scatter))
    hz = 1200 * 6 ** (pitch ** 2)
    return np.transpose([i / SR, db[0] + SMALL_CRACK_DB, hz, *(db[1:] + SMALL_BURST_DB)])


def snaps():
    """Each break rings at the pitch of its piece; bright dust and dull crumbs burst out, then settle."""
    puffs, bright, dull, cracks, ticks, tocks = np.zeros((6, N))
    ms = np.arange(int(0.3 * SR)) * 1000 / SR
    burst = (ms / 1.98 * np.exp(1 - ms / 1.63)) ** 2
    settling = (1 - np.exp(-ms / 17.2)) * np.exp(-ms / 14.8)
    tick_shape, tock_shape = np.exp(-ms[:256] / TICK_MS), np.exp(-ms[:256] / DULL_TICK_MS)
    for s, peak_db, hz, dust_db, crumbs_db in [*SNAP_EVENTS, *small_snaps()]:
        spray = makeup_ratio(SPRAY_DB + SPRAY_SLOPE * (max(dust_db, crumbs_db) + 35.0)) * settling
        add(puffs, s, makeup_ratio(dust_db - 1.5) * burst)
        add(bright, s, makeup_ratio(dust_db + DUST_SPRAY_DB) * spray)
        add(dull, s, makeup_ratio(crumbs_db) * (makeup_ratio(-11.0) * burst + spray))
        tick_s = s + TICK_AFTER_MS / 1000
        add(ticks, tick_s, makeup_ratio(dust_db + TICK_DB) * tick_shape * rng.standard_normal(256))
        add(tocks, tick_s, makeup_ratio(crumbs_db + DULL_TICK_DB) * tock_shape * rng.standard_normal(256))
        push = burst[:2048:2] * rng.standard_normal(1024)  # the burst at twice the speed
        crack = ring(push, hz, PIECE_CYCLES / hz)
        add(cracks, s + CRACK_AFTER_MS / 1000, makeup_ratio(peak_db) * crack / np.abs(crack).max())
    dust_noise = puffs * grains(9000.0, 1.5, 0.25) + bright * grains(2500.0, 2.4, 0.68)
    dust = colour(dust_noise, DUST_SPECTRUM)
    crumbs = colour(dull * grains(1400.0, 1.6, 0.45), CRUNCH_SPECTRUM)
    strikes = np.diff(crumbs + makeup_ratio(CRACK_BOWL_DB - CRUMBS_BOWL_DB) * cracks, prepend=0)
    landed = sum(ring(strikes, hz, 1.65 / width) for hz, width, _ in BOWL_MODES[3:])
    ticking = colour(tocks, CRUNCH_SPECTRUM[3:]) + colour(ticks, PORT_SPECTRUM[1:])
    return dust + crumbs + makeup_ratio(CRUMBS_BOWL_DB) * landed + cracks + ticking


def thuds():
    """A blow travels as a bending wave: quick swings arrive first, and later ones mostly lengthen."""
    out = np.zeros(N)
    ms = np.arange(int(0.12 * SR)) * 1000 / SR
    for s, db, swing_ms, decay_ms, direction, evenness in THUD_EVENTS:
        # the contact builds up faster for a hard blow
        rise_ms = BUILD_UP * makeup_ratio(-HARDENING * db) * swing_ms
        rise = 1 - np.exp(-(ms / rise_ms) ** 2)
        fall = np.exp(-(ms / (0.73 * decay_ms)) ** 0.84)
        wave = rise * fall * np.sin(np.pi * (ms / swing_ms) ** evenness)
        add(out, s, np.sign(direction) * makeup_ratio(db) * wave / np.abs(wave).max())
    return out


def swishes():
    """A slide or scrape swells fast and fades; its hiss gathers round one pitch."""
    out = np.zeros(N)
    slides = [(*row, SLIDE_WIDTH * row[3]) for row in SLIDE_EVENTS]
    for s, length, db, hz, width in [*slides, *SCRAPE_EVENTS]:
        u = np.linspace(0, 1, int(length * SR))
        hiss = band(rng.standard_normal(8192), hz, width)[-len(u):]
        add(out, s, makeup_ratio(db) * np.sin(np.pi * u ** 0.67) * hiss)
    return colour(out * flicker(150.0, 2.9), PORT_SPECTRUM)


def knocks():
    """Soft kicks ring the modes of the bowl; falling grit taps it all the while."""
    kicks = np.zeros(N)
    for s, db in KNOCK_EVENTS:
        add(kicks, s, makeup_ratio(db) * np.hanning(16) / 16.7)
    taps = np.diff(grains(GRIT_PER_S, 1.6, 0.2), prepend=0)
    grit = taps * curve(HAND_WORK, 2) * makeup_ratio(GRIT_DB)
    return sum(makeup_ratio(db) * ring(kicks + grit, hz, 2.76 / width) for hz, width, db in BOWL_MODES)


def bangle_gains(group_db):
    """Spreads six group levels over the ten modes of the hoop, as gains."""
    return makeup_ratio(np.repeat(group_db, [1, 1, 1, 1, 2, 4]) + np.array(BANGLE_TRIM_DB))


def bangle():
    """A thin metal hoop; where it is touched decides which modes ring, and the wrist damps them unevenly."""
    kicks = np.zeros((len(BANGLE_MODE_HZ), N))
    for s, *group_db in CLINK_EVENTS:
        kicks[:, int(s * SR)] += np.sqrt(2) * bangle_gains(group_db)
    chatter = grains(900.0, 1.5, 1.7)
    # steady pushes build a mode up by the root of its ring time
    steady = np.sqrt(4 * np.log(1000) / SR / np.array(BANGLE_RING_S))
    for s, length, low_db, db, high_db in RATTLE_EVENTS:
        push = bangle_gains([db - 18, low_db, db, high_db, high_db - 14, high_db]) * steady
        kicks += np.outer(push, chatter * (T > s) * (T < s + length))
    out = np.zeros(N)
    for kick, hz, t60 in zip(kicks, BANGLE_MODE_HZ, BANGLE_RING_S):
        free = makeup_ratio(FREE_RING_DB) * ring(kick, hz, FREE_RING_TIMES * t60)
        out += (ring(kick, hz, t60) + free) * flicker(70.0, 2.2)
    return out


def sway():
    """The stand swings at its own slow, drifting pitch; jolts build the swing up, then it dies away."""
    size = makeup_ratio(TREMBLE_DB) * curve(HAND_WORK, 3) * flicker(3.4, 6.2)
    for s, db, rise_s, db_per_s in JOLT_EVENTS:
        below_db = np.where(T < s, 25 * ((s - T) / rise_s) ** 2, db_per_s * (T - s))
        size = np.maximum(size, makeup_ratio(db - below_db))
    drift = 1 + 0.03 * np.log(flicker(17.0, 8.6))
    swing = np.sqrt(2) * np.sin(2 * np.pi * np.cumsum(SWAY_HZ * drift) / SR)
    shudder = makeup_ratio(SHUDDER_DB) * colour(grains(150.0, 3.4, 4.9), TABLE_HUM_SPECTRUM)
    return size * (swing + shudder)


def room():
    """Steady noise of the quiet room, strongest in the bass."""
    return makeup_ratio(ROOM_DB) * colour(rng.standard_normal(N), ROOM_SPECTRUM)


def scene():
    """Everything near the bowl over the quiet room, in one channel."""
    close = hands() + swishes() + snaps() + thuds() + knocks() + bangle()
    return (close + sway() + room())[None]


def band_limit(x):
    """A steep low-pass at the top of the band."""
    return signal.sosfilt(signal.butter(12, 16330, fs=SR, output="sos"), x)


def record(dry):
    """The phone clips at full scale."""
    return band_limit(np.clip(dry, -1, 1))


dry = scene()
out = record(dry)
transcribe(out)
```